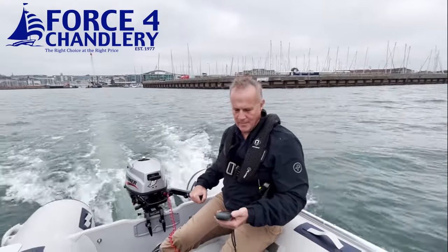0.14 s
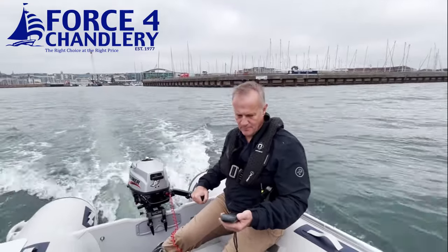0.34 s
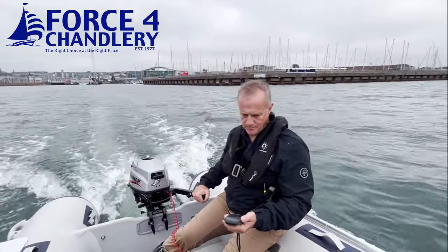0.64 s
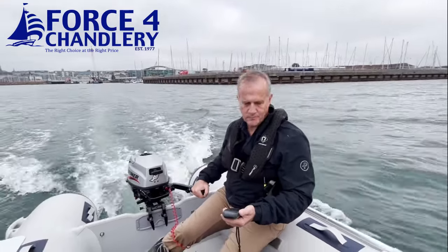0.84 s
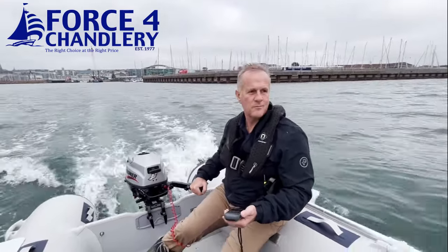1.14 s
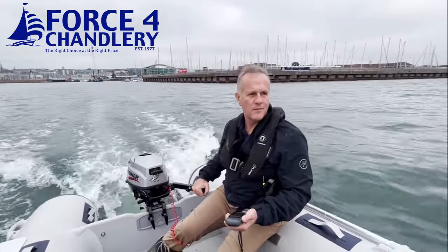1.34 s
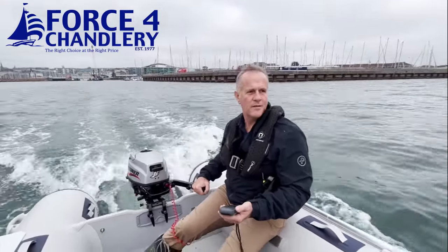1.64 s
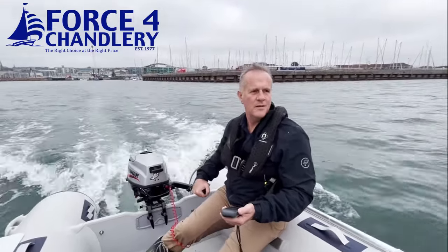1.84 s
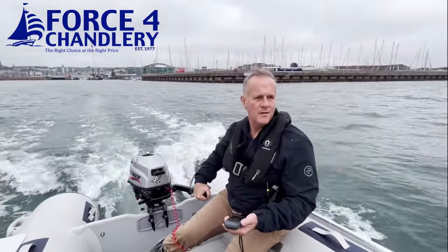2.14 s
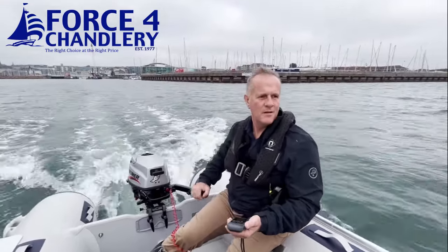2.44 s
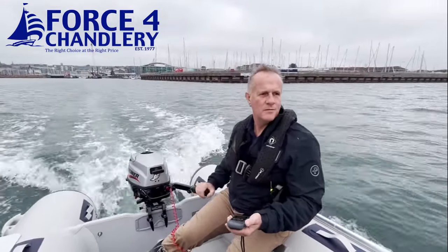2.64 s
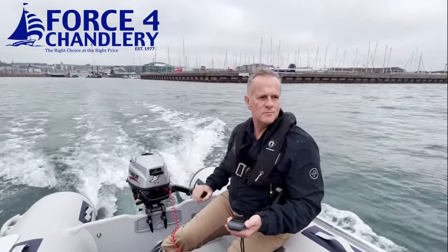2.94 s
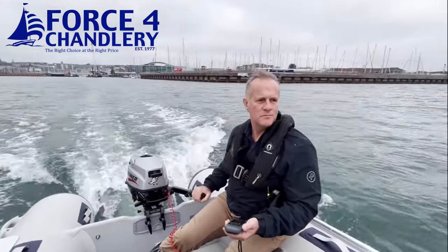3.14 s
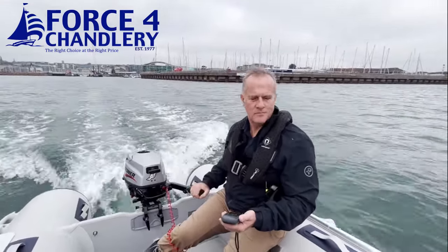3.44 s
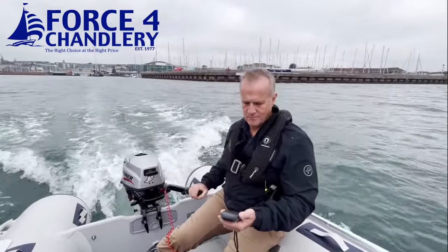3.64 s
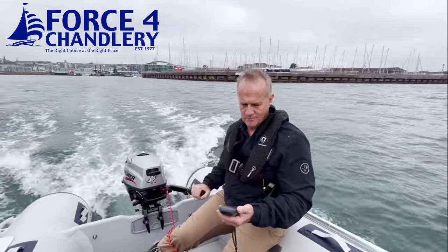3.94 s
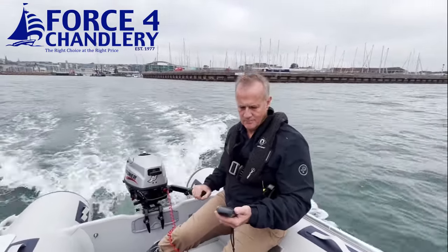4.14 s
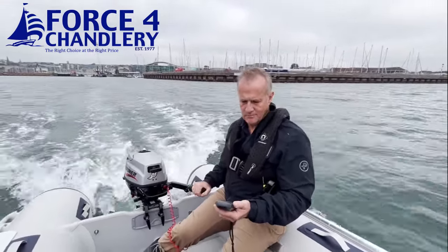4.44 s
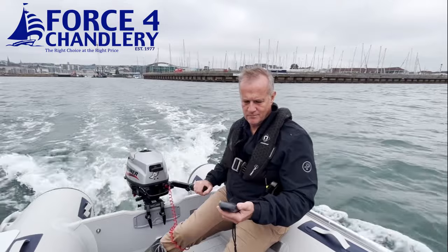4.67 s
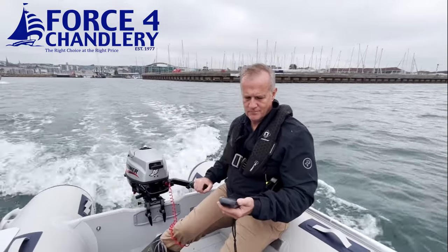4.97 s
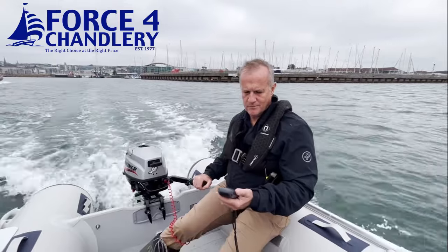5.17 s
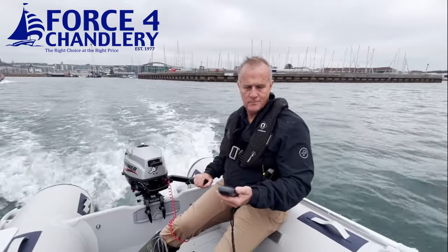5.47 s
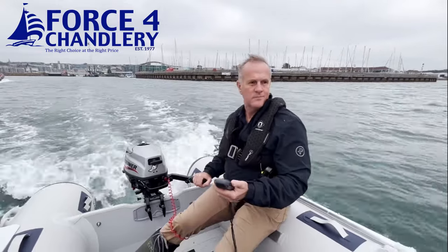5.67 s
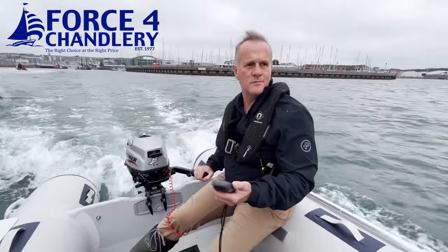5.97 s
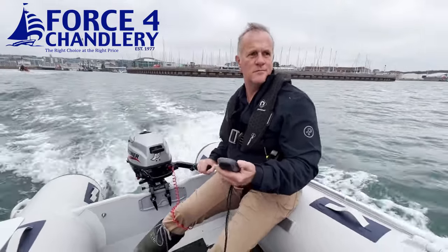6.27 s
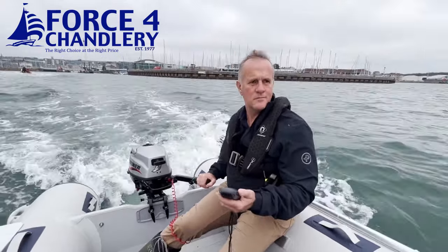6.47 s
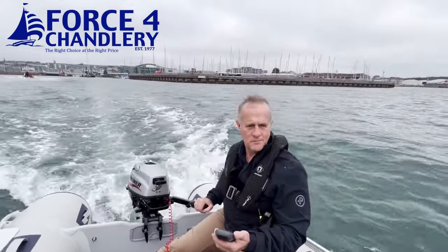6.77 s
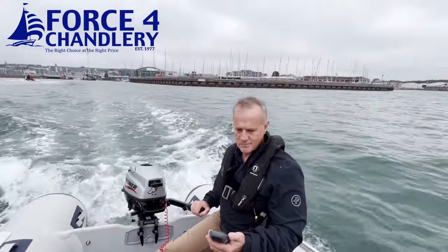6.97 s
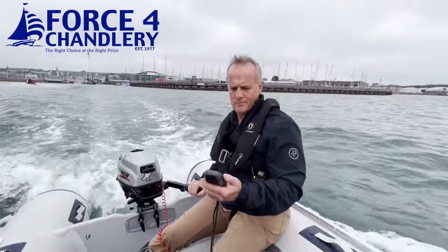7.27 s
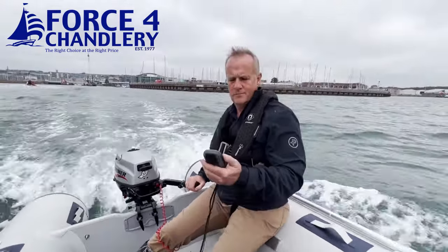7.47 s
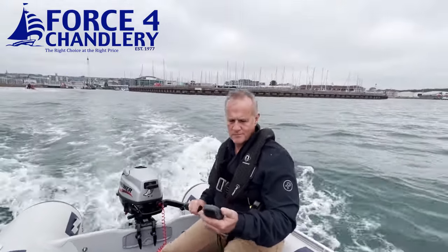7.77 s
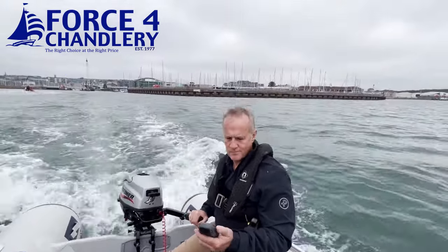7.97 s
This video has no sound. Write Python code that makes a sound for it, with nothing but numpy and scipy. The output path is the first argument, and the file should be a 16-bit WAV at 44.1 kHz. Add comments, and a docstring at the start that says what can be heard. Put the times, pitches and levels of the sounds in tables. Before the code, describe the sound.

A small outboard engine drones steadily at full throttle, clattering lightly, while water rushes along an inflatable boat's hull.

```python
"""Small outboard at full throttle

A single-cylinder four-stroke drives an inflatable boat, heard from on board. Exhaust and intake pulses
drone through the leg, each firing rings the cowl, and the valve gear clatters in step. The propeller
hums underneath while the wake rushes and fizzes along the hull. One wavelet slaps the tube; later a
loose part knocks harder for a second, and there is one faint tick."""
import sys
import numpy as np
from scipy import signal
from scipy.fft import rfft, irfft, next_fast_len
from scipy.io import wavfile
from scipy.ndimage import uniform_filter1d

SR = 44100
rng = np.random.default_rng(int(sys.argv[2]) if len(sys.argv) > 2 else 0)


def log_audio(samples):
    """Write samples as a 16-bit WAV file to the path given in sys.argv[1]."""
    # one column per channel
    frames = np.atleast_2d(samples).T
    # limit to full scale, then quantise
    limited = np.clip(frames, -1, 1)
    pcm = np.round(limited * 32767).astype(np.int16)
    wavfile.write(sys.argv[1], SR, pcm)


N = 357651
T = np.arange(N) / SR
FFT_SIZE = next_fast_len(N)
FREQS = np.fft.rfftfreq(FFT_SIZE, 1 / SR)


def undb(db):
    """Decibels to gain."""
    return 10 ** (np.asarray(db) / 20)


def unit(x):
    """Scale to rms 1."""
    return x / np.sqrt(np.mean(x ** 2))


def curves(table):
    """Per-sample curve of each column after time_s."""
    time_s, *columns = np.transpose(table)
    return [np.interp(T, time_s, column) for column in columns]


def spells(table):
    """Lift in dB: each spell fades in, holds, fades out."""
    def ramp(centre_s, fade_s):
        return np.clip(.5 + (T - centre_s) / fade_s, 0, 1)
    return sum(db * ramp(start_s, in_s) * (1 - ramp(end_s, out_s))
               for start_s, end_s, in_s, out_s, db in table)


def walk(rate_hz):
    """Smooth random drift, spread near 1."""
    levels = np.interp(T * rate_hz, np.arange(4096), rng.standard_normal(4096))
    return 1.25 * uniform_filter1d(levels, max(int(SR / rate_hz), 2) // 2)


def per_cycle(cycle, spread_db):
    """Random gain, gliding to a new value each cycle."""
    return undb(spread_db * np.interp(cycle, np.arange(512), rng.standard_normal(512)))


def filtered(x, response):
    """Apply a frequency response; rms 1."""
    return unit(irfft(rfft(x, FFT_SIZE) * response, FFT_SIZE)[:N])


def colour(points):
    """Response through (freq_hz, gain_db) points."""
    hz, db = np.transpose(points)
    return undb(np.interp(np.log(FREQS + 1), np.log(hz), db))


def resonances(modes):
    """Response of modes ringing together; mass damps the treble above each."""
    response = 0
    for hz, width_hz, db in modes:
        damping = 1j * FREQS * width_hz
        peak = damping / (hz ** 2 - FREQS ** 2 + damping)
        response += undb(db) * peak / (1 + (FREQS / (2 * hz)) ** 4)
    return response


# Engine speed: time_s, firing_hz
ENGINE_SPEED = [(0, 42.0), (0.7, 41.91), (1.1, 41.99), (1.7, 41.98), (2.35, 42.39), (2.75, 42.23),
                (3.1, 42.16), (3.35, 42), (3.6, 42.32), (4.1, 42.02), (4.75, 41.89), (5.2, 42.05),
                (5.75, 42.1), (6.05, 41.76), (6.45, 41.98), (7.0, 41.58), (7.55, 41.8), (8.11, 41.76)]


def crank(jitter_cycles=0.00052):
    """Cycle count (two turns each) and mean firing rate; uneven combustion jitters the timing."""
    firing_hz, = curves(ENGINE_SPEED)
    cycle = 1.244 + np.cumsum(firing_hz) / SR + jitter_cycles * walk(25)
    return cycle, firing_hz.mean()


# Exhaust, its two echoes in the leg, intake, combustion: place_cycles, width_ms, push (suction < 0)
PRESSURE_PULSES = [(0, .42, -1), (.11, .42, -.5), (.37, .4, -.22), (.62, .42, -.68), (.745, .2, .7)]


def pulse_partials(cycle, firing_hz, partials, scatter_db, waver_db):
    """Wavering firing harmonics; the pressure pulses set the phases, reflections smear the high ones."""
    tone = 0
    for order, db in partials:
        hz = order * firing_hz
        pulses = sum(push * np.exp(-2j * np.pi * order * place - (2 * np.pi * hz * ms / 1000) ** 2 / 2)
                     for place, ms, push in PRESSURE_PULSES)
        smear_rad = .42 * (hz / 500) ** 2 * rng.standard_normal()
        gain = undb(db + waver_db * (walk(1.47) + walk(9)))
        tone += gain * np.cos(2 * np.pi * order * cycle + np.angle(pulses) + smear_rad)
    return unit(tone) * per_cycle(cycle, scatter_db)


# Drone radiated by leg and cowl: firing_order, relative_db
DRONE_PARTIALS = [(1, -15.5), (2, 2), (3, -1), (4, -14.5), (5, -13), (6, -1), (7, -16.5), (8, -1.5),
                  (9, -9), (10, -6), (11, -8), (12, -11), (13, -10), (14, -12), (15, -15), (16, -23),
                  (17, -17), (18, -20.5), (19, -45), (20, -19.5), (21, -15), (22, -21), (23, -15),
                  (24, -20.5), (25, -12), (26, -20.5), (27, -17.5), (28, -33), (29, -50), (30, -21.5),
                  (31, -21.5)]
# Drone band levels before trim: time_s, boom_db, bark_db, cowl_db
DRONE_BANDS = [(0.06, -24, -25, -28.5), (0.1, -24, -24.5, -30.5), (0.86, -23, -24, -28.5),
               (0.97, -23, -25, -31), (1.46, -23.5, -24, -30), (1.99, -22.5, -24.5, -33),
               (2.19, -23, -24.5, -31), (3.19, -23, -23, -31.5), (3.33, -23.5, -23, -30),
               (5.88, -23, -23.5, -31.5), (6.88, -23, -24, -29.5), (7.1, -24.5, -23.5, -29),
               (7.33, -25, -22, -32.5), (8.04, -22, -23.5, -28.5)]


def drone(cycle, firing_hz):
    """The exhaust carries the low boom and mid bark, the cowl the higher partials."""
    boom_db, bark_db, cowl_db = curves(DRONE_BANDS)
    boom = pulse_partials(cycle, firing_hz, DRONE_PARTIALS[:4], scatter_db=0.65, waver_db=0.66)
    bark = pulse_partials(cycle, firing_hz, DRONE_PARTIALS[4:19], scatter_db=0.37, waver_db=0.53)
    cowl = pulse_partials(cycle, firing_hz, DRONE_PARTIALS[19:], scatter_db=1.0, waver_db=1.0)
    return undb(boom_db + 0.2) * boom + undb(bark_db + 0.12) * bark + undb(cowl_db - 0.87) * cowl


# Metal knocks in one cycle: place_cycles, decay_cycles, force_db
CYCLE_KNOCKS = [(.95, .1, 0), (.17, .07, -8), (.39, .09, -4), (.69, .07, -6)]


def contact_force(cycle, floor_db):
    """Force jumps at each knock and decays to a floor."""
    return undb(floor_db) + sum(undb(db) * np.exp(-((cycle - place) % 1) / decay)
                                for place, decay, db in CYCLE_KNOCKS)


def chatter(cycle, floor_db, size=1024):
    """Fine contact noise, the same every cycle, with a flat spectrum."""
    spectrum = rfft(rng.standard_normal(size) * contact_force(np.arange(size) / size, floor_db))
    pattern = irfft(spectrum / abs(spectrum), 8 * size)
    return unit(np.interp(cycle % 1, np.arange(len(pattern)) / len(pattern), pattern))


def clatter(cycle, loose_share, drift_rad, floor_db, scatter_db):
    """Metal contacts: chatter whose fine tone colour slowly wanders, plus rattle that never repeats."""
    blend_rad = drift_rad * walk(1.53)
    steady = np.cos(blend_rad) * chatter(cycle, floor_db) + np.sin(blend_rad) * chatter(cycle, floor_db)
    force = contact_force(cycle, floor_db) * per_cycle(cycle + 0.18, scatter_db)
    rattle = unit(force * rng.standard_normal(N))
    return np.sqrt(1 - loose_share) * steady + np.sqrt(loose_share) * rattle


# Cowl panel modes: pitch_hz, width_hz, gain_db
COWL_MODES = [(1517, 75, 2), (1615, 124, 7), (1766, 54, 5), (1941, 43, 6), (2110, 103, 4.5), (2207, 26, -4),
              (3670, 480, -7.5), (4060, 320, -13)]
# Harder panel buzz: start_s, end_s, fade_in_s, fade_out_s, lift_db
COWL_SPELLS = [(.86, 3.47, 0.094, .1, 3), (5.5, 6.82, .2, 0.6, 6), (7.05, 8.3, .4, .1, 4.5)]


def cowl_panels(cycle, base_db):
    """Knocks in each cycle set the cowl panels buzzing."""
    contacts = clatter(cycle, loose_share=0.17, drift_rad=0.51, floor_db=-6, scatter_db=-4)
    return undb(base_db + spells(COWL_SPELLS)) * filtered(contacts, resonances(COWL_MODES))


# Tappet modes: pitch_hz, width_hz, gain_db
TAPPET_RING = [(2760, 50, -5), (2823, 19, 5), (2958, 105, -5), (3004, 31, -2), (3370, 114, -8.5),
               (3620, 94, -35)]
# Tappets and valve gear ringing out: start_s, end_s, fade_in_s, fade_out_s, lift_db
VALVE_SPELLS = [(-.1, .89, .1, .14, 6.5), (3.5, 5.4, .1, .5, 5.5), (6.93, 8.3, 0.22, .1, 4)]


def tappets(cycle, base_db, spell_share=0.63, rise_db_per_s=0.27):
    """Struck tappets ring, slowly growing louder."""
    contacts = clatter(cycle, loose_share=0.26, drift_rad=0.36, floor_db=-7.5, scatter_db=-1)
    level_db = base_db + spell_share * spells(VALVE_SPELLS) + rise_db_per_s * T
    return undb(level_db) * filtered(contacts, resonances(TAPPET_RING))


# Valve gear spectrum: freq_hz, density_db
VALVE_SPECTRUM = [(1200, -27), (2400, -36), (3200, 5.5), (3650, 0.5), (4300, -6), (4600, -4), (5250, 0),
                  (5900, -6), (6750, -2.5), (7200, -11.5), (7900, -12.5), (8800, -27.5), (10000, -16.5),
                  (15500, -35)]


def valve_gear(cycle, base_db, echo_gain=0.2):
    """Bright clatter; short paths round the engine block ripple its spectrum."""
    contacts = clatter(cycle, loose_share=0.47, drift_rad=1.0, floor_db=-10, scatter_db=0.5)
    ripple = 1
    for _ in range(10):
        sign, delay_s = rng.choice([-1, 1]), rng.uniform(.001, .009)
        ripple += echo_gain * sign * np.exp(-2j * np.pi * FREQS * delay_s)
    return undb(base_db + spells(VALVE_SPELLS)) * filtered(contacts, colour(VALVE_SPECTRUM) * ripple)


# Rushing water spectrum: freq_hz, density_db
WAKE_SPECTRUM = [(20, -24), (40, 5.5), (70, 1.5), (115, 5), (165, 3.5), (220, 2.5), (600, 1), (800, -1),
                 (1080, 1.5), (1450, -9), (2400, -23), (4000, -23.5), (6500, -36), (10200, -38),
                 (15500, -50)]
# Waves met by the hull: centre_s, length_s, swell_db (trough < 0)
HULL_WAVES = [(3.903, 0.54, 1), (6.052, 0.2, 2.5), (6.96, .08, -4.5), (7.35, 0.52, 1.5), (7.9, .3, 2)]


def wake(base_db, spray_db=2.0, flicker_db=1.6, fizz=1.26, bubbles_per_s=3000, bands=9):
    """Water in flickering octave bands: low churn surges with the waves, bursting bubbles fizz on top."""
    swell_db = sum(db * np.exp(-(2 * (T - centre_s) / length_s) ** 2)
                   for centre_s, length_s, db in HULL_WAVES)
    surge_db = swell_db - swell_db.mean()
    bubbles = (rng.random(N) < bubbles_per_s / SR) * rng.standard_normal(N)
    bubbles *= undb(2.7 * np.minimum(rng.exponential(size=N), 4))
    spray = fizz * FREQS / (FREQS + 3000) * rfft(unit(bubbles), FFT_SIZE)
    spectrum = (rfft(rng.standard_normal(N), FFT_SIZE) + spray) * colour(WAKE_SPECTRUM)
    octave = np.clip(np.log2((FREQS + 1) / 50), 0, bands - 1)
    water = 0
    for k in range(bands):
        band = irfft(spectrum * np.maximum(1 - abs(octave - k), 0), FFT_SIZE)[:N]
        churn_share = 1 / (1 + (k / 5.5) ** 8)
        churn_db = churn_share * (surge_db + flicker_db * walk(22))
        water += band * undb(churn_db + (0.5 - churn_share) * spray_db * walk(30))
    return undb(base_db + swell_db.mean()) * unit(water)


# Three-blade propeller tones: shaft_order, level_db
PROPELLER_TONES = [(2.532, -52), (3, -44), (4.098, -44.5), (6.001, -57), (7.003, -53.5)]


def propeller(cycle, gear_ratio=28 / 13, waver_db=6):
    """Blade tones on the geared-down shaft, unsteady in churned water."""
    turns = 2 * cycle / gear_ratio
    hum = 0
    for order, db in PROPELLER_TONES:
        amplitude = np.sqrt(2) * undb(db + waver_db * np.tanh(walk(6)))
        hum += amplitude * np.cos(2 * np.pi * order * turns + walk(4))
    return hum


# Water on the tube: start_s, level_db
TUBE_SLAPS = [(2.754, -34)]


def tube_slap(centre_hz=1980, width_hz=1300, decay_s=0.017):
    """A wavelet smacks the tube: a short burst of spray."""
    spray = filtered(rng.standard_normal(N), resonances([(centre_hz, width_hz, 0)]) ** 2)
    return spray * sum(undb(db) * (T > start_s) * np.exp(-abs(T - start_s) / decay_s)
                       for start_s, db in TUBE_SLAPS)


# Harder knocking: start_s, end_s, fade_in_s, fade_out_s, lift_db
LOOSE_SPELLS = [(5.97, 6.98, .12, 0.22, 5.5)]


def loose_part(cycle, base_db, pitch_hz=4120, width_hz=590, place_cycles=.28, decay_cycles=0.045):
    """A loose metal part, struck once a cycle, rings briefly."""
    blows = np.exp(-((cycle - place_cycles) % 1) / decay_cycles) * rng.standard_normal(N)
    ring = filtered(blows, resonances([(pitch_hz, width_hz, 0)]) ** 2)
    return undb(base_db + spells(LOOSE_SPELLS)) * ring


# Faint dry tick: peak_s, level_db
DRY_TICKS = [(5.997, -47)]


def tick(decay_s=.0002):
    """A bright snap, about a millisecond long."""
    envelope = sum(undb(db) * np.exp(-abs(T - peak_s) / decay_s) for peak_s, db in DRY_TICKS)
    return envelope * rng.standard_normal(N)


def scene():
    """Engine, water and propeller, close by, in mono; one crank times all the machinery."""
    cycle, firing_hz = crank()
    engine = drone(cycle, firing_hz) + cowl_panels(cycle, base_db=-45.5)
    engine += tappets(cycle, base_db=-48) + valve_gear(cycle, base_db=-54)
    water = wake(base_db=-32.5) + tube_slap()
    knock = loose_part(cycle, base_db=-59)
    return (engine + water + knock + propeller(cycle) + tick())[None]


def record(dry, cutoff_hz=15700):
    """The microphone's top end stops steeply."""
    return signal.sosfilt(signal.ellip(10, .2, 80, cutoff_hz, fs=SR, output="sos"), dry)


dry = scene()
out = record(dry)
log_audio(out)
```